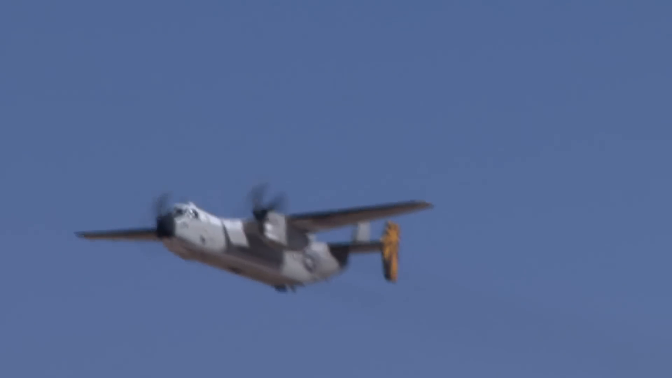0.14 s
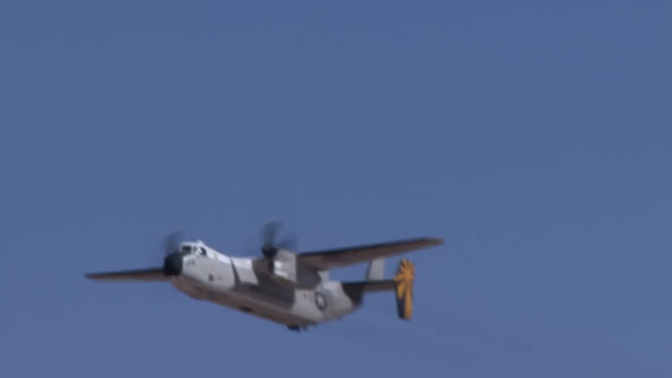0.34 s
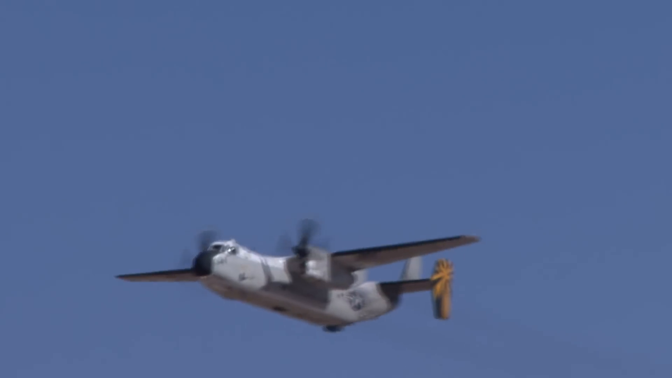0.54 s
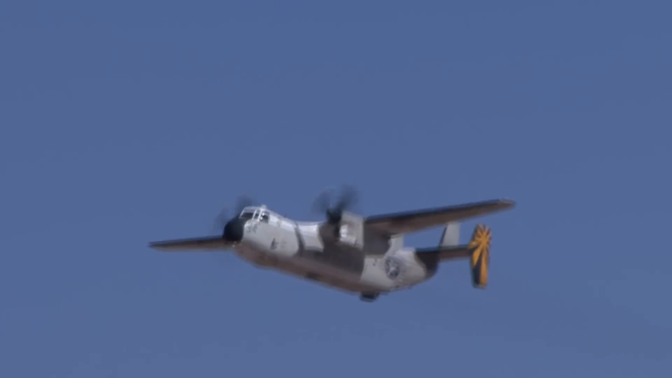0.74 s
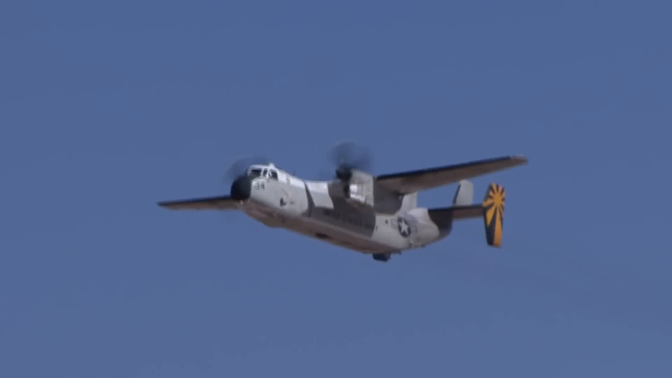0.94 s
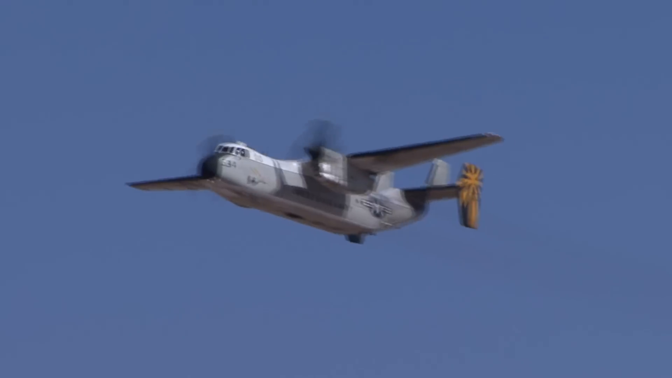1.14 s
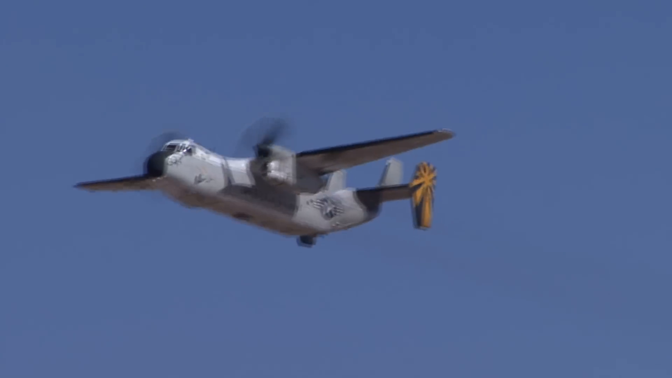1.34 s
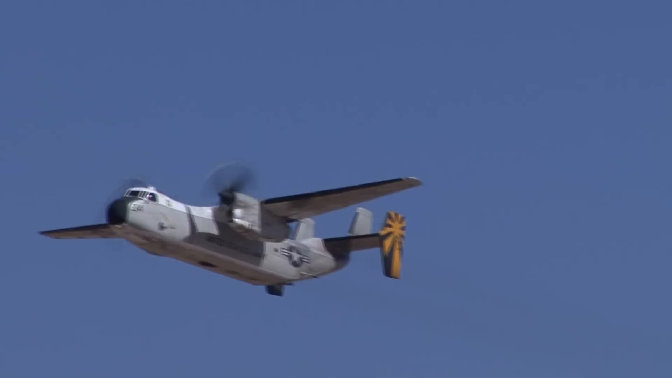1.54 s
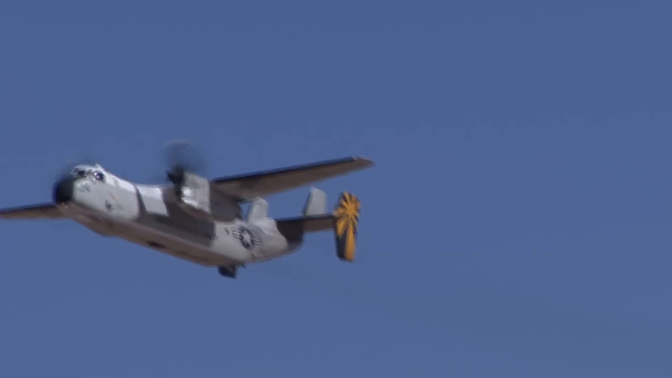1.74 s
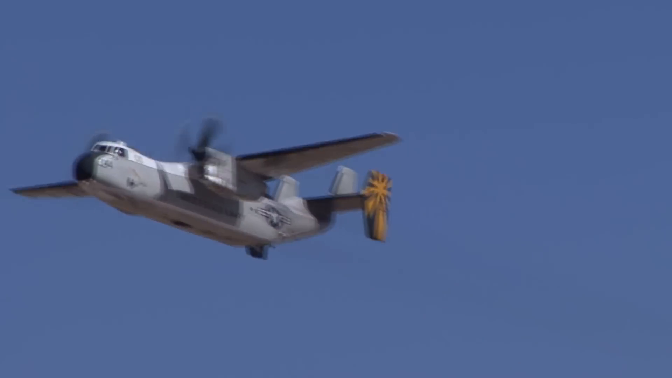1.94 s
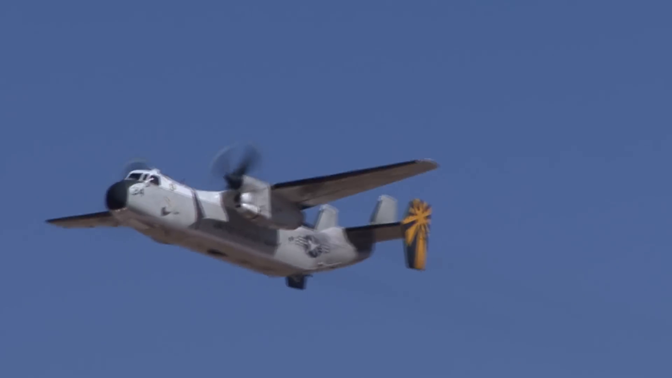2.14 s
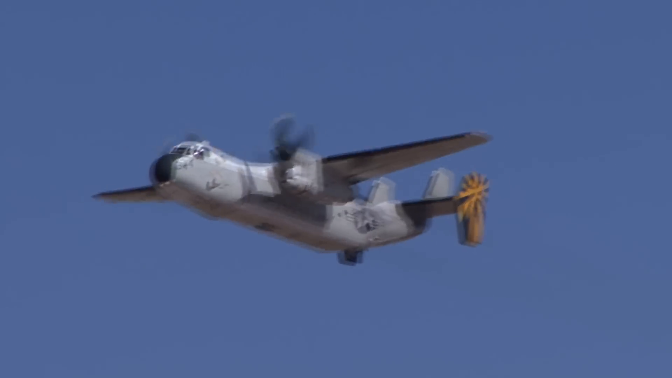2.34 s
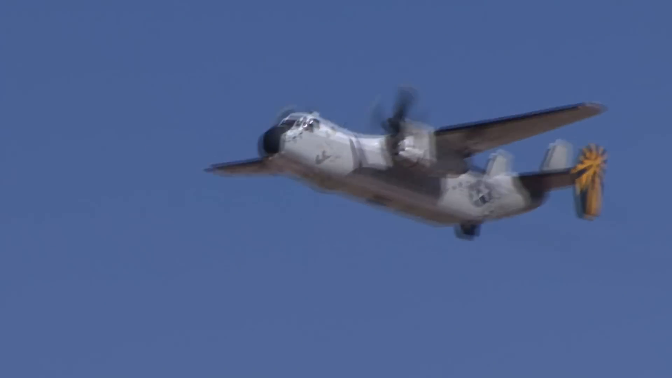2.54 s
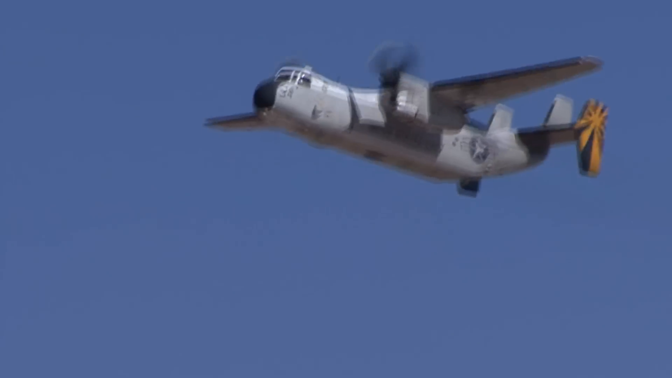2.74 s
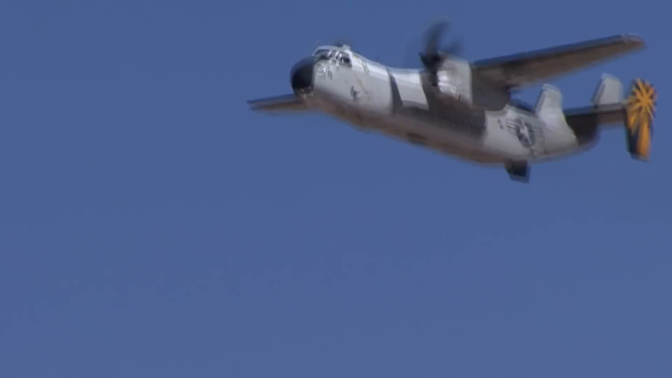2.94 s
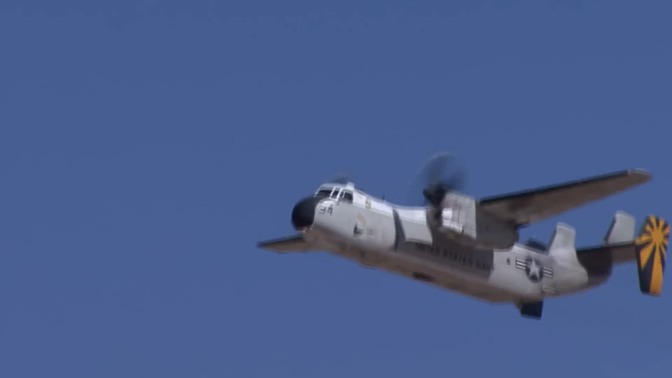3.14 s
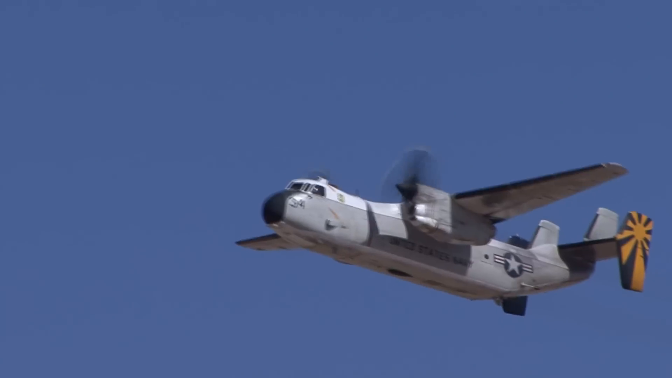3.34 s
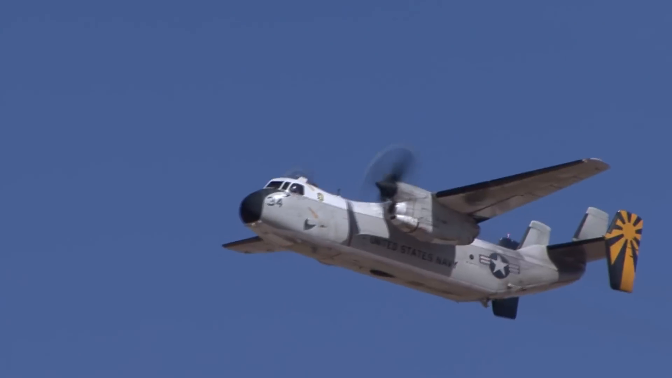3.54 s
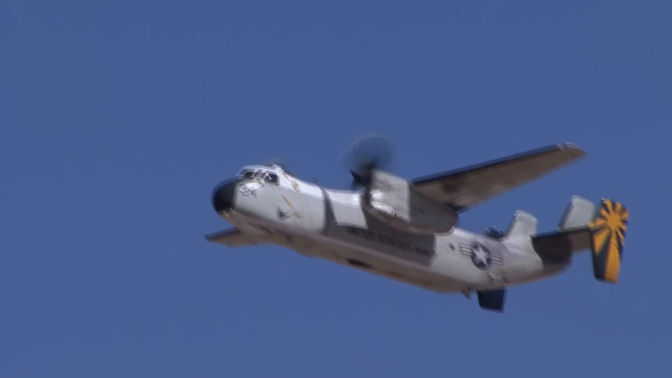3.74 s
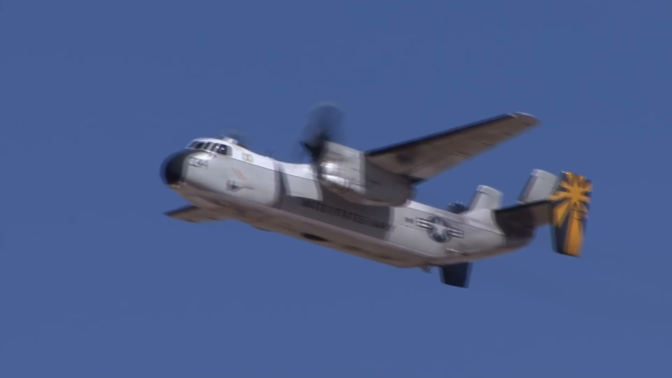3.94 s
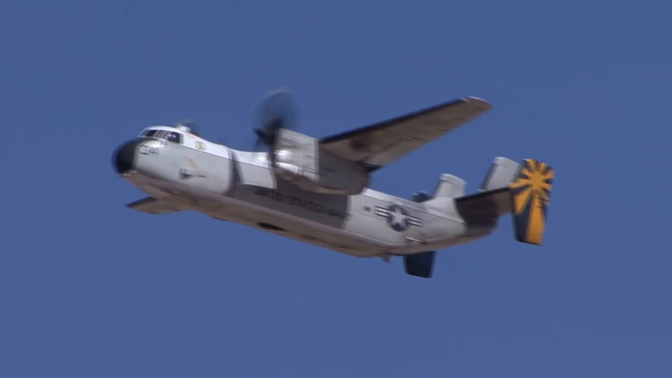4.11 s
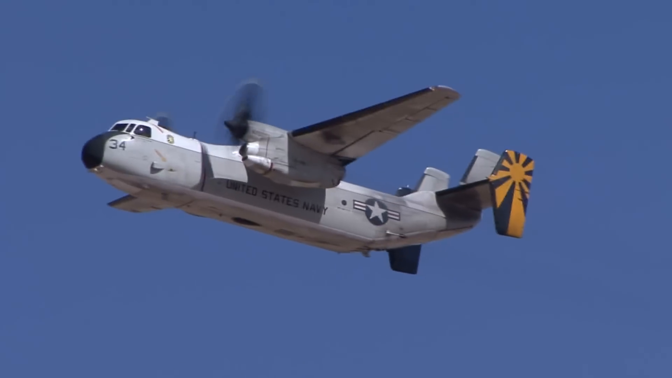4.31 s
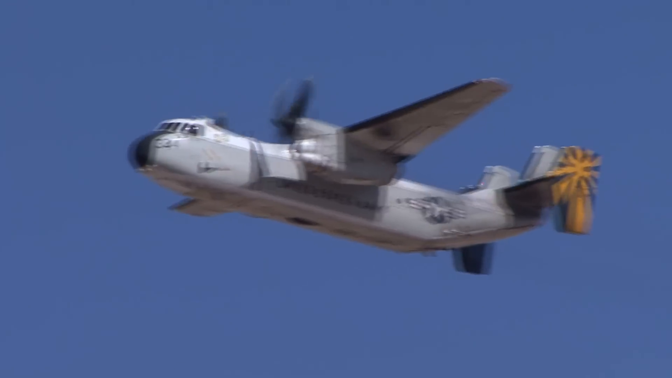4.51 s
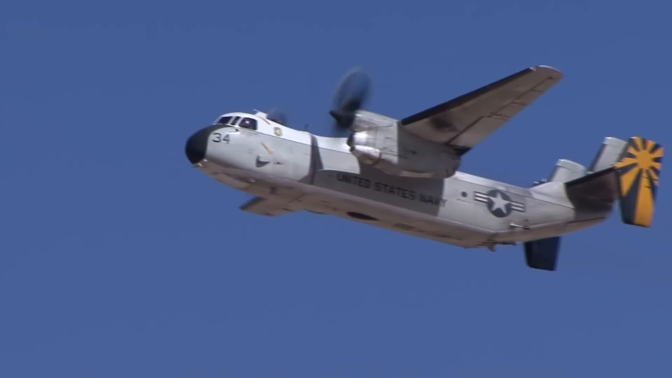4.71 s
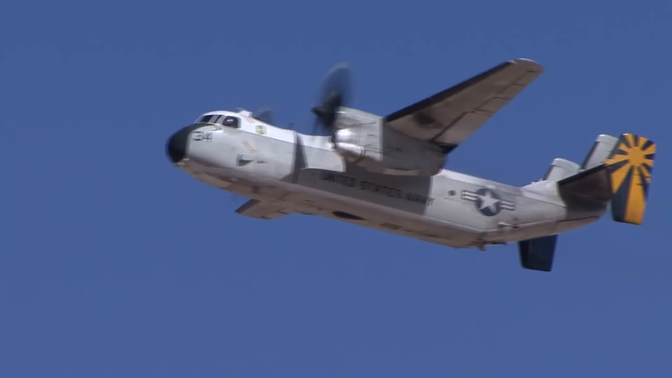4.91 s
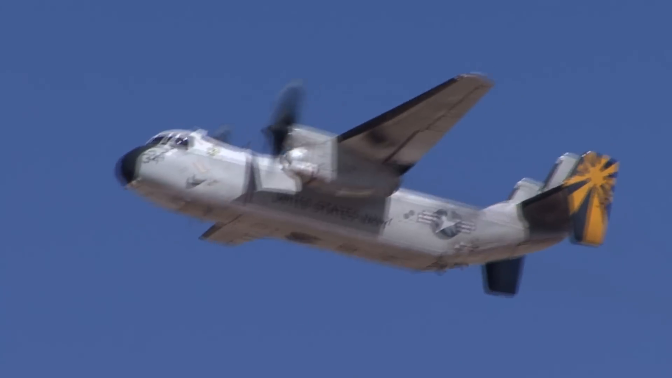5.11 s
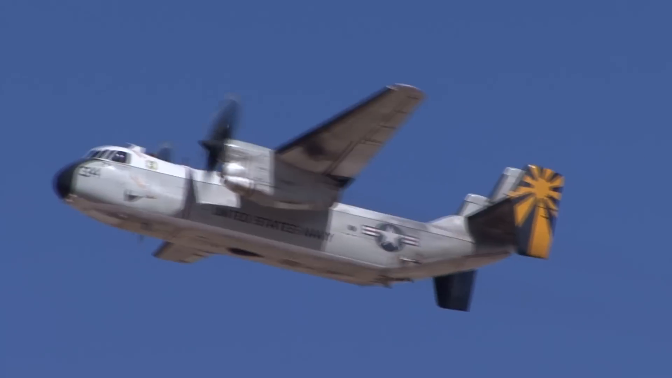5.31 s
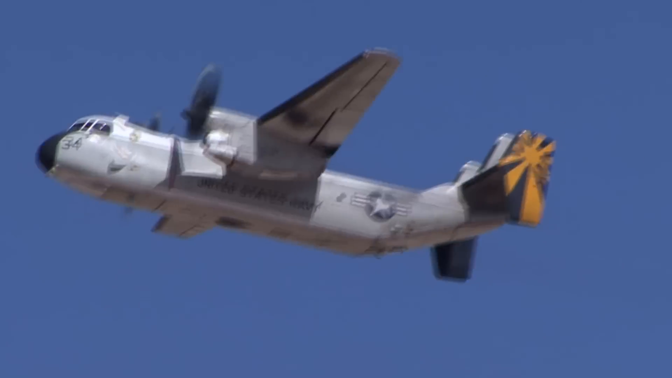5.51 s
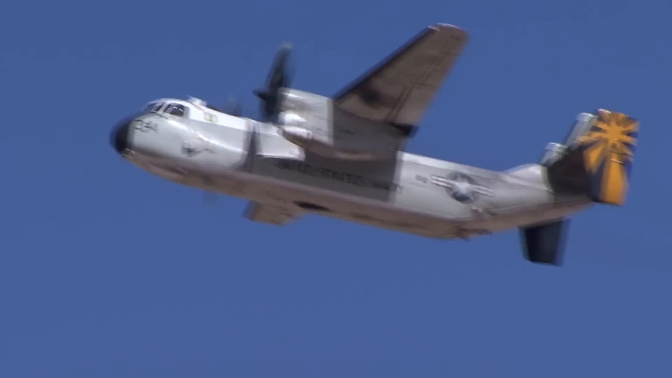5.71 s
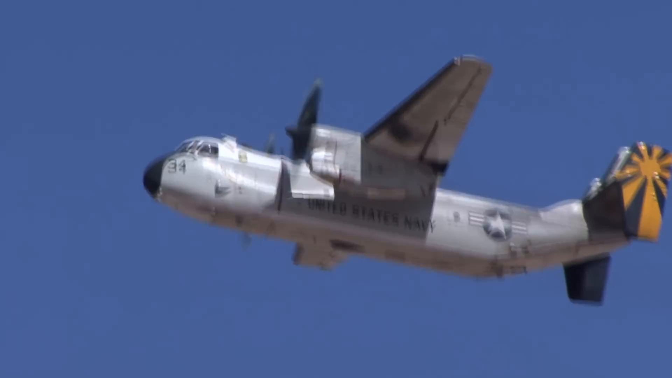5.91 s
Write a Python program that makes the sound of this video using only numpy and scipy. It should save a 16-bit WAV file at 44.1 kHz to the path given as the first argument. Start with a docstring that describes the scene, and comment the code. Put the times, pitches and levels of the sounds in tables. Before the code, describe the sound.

Outdoors, a twin-engined propeller plane approaches and flies by. A low, throbbing blade drone sits inside a broad roar that swells and fades unevenly in turbulent air. A faint thin whine rides above. The drone gets steadier and stronger as the plane nears, its pitch slipping gently down. The distant microphone picks up only a faint steady hiss besides, and the sound stops while still loud.

```python
"""Under an open sky, a twin turboprop flies low past, its pitch sinking as it draws level.
The propellers drone on harmonics of their blade rate, with a fainter buzz of upper harmonics.
Blade wakes and exhaust roar: noise in bands that swell and fade in the uneven air and phase
against their echo off the ground. Two compressor tones whine thinly on top of a faint steady hiss."""
import sys
import numpy as np
from scipy import signal
from scipy.fft import rfft, irfft
from scipy.io import wavfile

SR = 44100
rng = np.random.default_rng(int(sys.argv[2]) if len(sys.argv) > 2 else 0)


def master(y):
    """Save y as 16-bit WAV."""
    cut = np.clip(np.atleast_2d(y).T, -1, 1)
    pcm = np.round(cut * 32767)  # scale
    wavfile.write(sys.argv[1], SR, pcm.astype(np.int16))


N = 267246

# How each zone of the turbulent noise responds, from deep rumble through growl and roar to topmost hiss:
# (centre f/Hz, share of the swell, share of the rush, share of the treble, rise on approach/(dB/s))
NOISE_ZONES = [(50, 0.011, 0.043, 0.07, 0.05), (125, 0, 0, .15, 0.5), (225, 0.18, 0.085, 0.22, 1.6),
               (320, 0, 0.09, 0.68, 0), (520, 0.45, 0, 0.42, -0.25), (920, 1.16, 0, 0, 0.06),
               (1390, 0.59, 0.4, 0, -0.24), (2050, 0, 0.94, 0.16, -0.14), (3400, 0.13, 0.052, 0.87, 1.07),
               (4940, 0.087, 0, 0.6, 2.5)]


def from_db(db):
    """Decibels to gain."""
    return 10 ** (np.asarray(db) / 20)


def rms_one(x):
    """Scale to unit power."""
    return x / np.sqrt(np.mean(np.abs(x) ** 2) + 1e-20)


def in_time(rows):
    """Each column of a curve table, sample by sample."""
    times, *columns = np.transpose(rows)
    t = np.arange(N) / SR
    return [np.interp(t, times, column) for column in columns]


def about_mean(curve):
    """A level curve as dB above and below its own mean."""
    level_db, = in_time(curve)
    return level_db - np.mean(level_db)


def low_pass(x, hz, order):
    """Butterworth low-pass."""
    return signal.sosfilt(signal.butter(order, hz, fs=SR, output="sos"), x)


def coloured(spectrum):
    """Noise with the given spectrum, read on a log-frequency axis; rms 1."""
    hz = np.maximum(np.fft.rfftfreq(N, 1 / SR), 1)
    f, level_db = np.transpose(spectrum)
    gain = from_db(np.interp(np.log(hz), np.log(f), level_db))
    white = rng.standard_normal(N)
    return rms_one(irfft(rfft(white) * gain, N))


def drift(rate_hz):
    """Smooth chance of spread 1, changing about `rate_hz` times a second."""
    step = 40  # samples between slow values
    settle = 2000  # slow values dropped while the filter settles
    pole = np.exp(-2 * np.pi * rate_hz * step / SR)
    white = rng.standard_normal(N // step + 2 + settle)
    slow = signal.lfilter([1], [1, -2 * pole, pole ** 2], white)[settle:]
    return np.interp(np.arange(N) / step, np.arange(len(slow)), rms_one(slow))


def scatter(rate_hz):
    """Random amplitude and phase of a tone that has crossed turbulent air; rms 1."""
    return rms_one(drift(rate_hz) + 1j * drift(rate_hz))


def tone(phase, gain):
    """A sine of rms 1 under a complex gain."""
    return np.sqrt(2) * np.real(gain * np.exp(1j * phase))


def blade_phase():
    """Phase of the blade passing, summed from its Doppler-shifted rate."""
    # blade passing rate as heard: (t/s, f/Hz)
    blade_rate = [(0.0, 93.31), (0.4, 92.57), (1.2, 91.97), (2.0, 91.77), (2.8, 91.48), (3.1, 90.88),
                  (3.4, 89.82), (4.25, 88.83), (5.0, 86.56), (5.25, 86.21), (6.06, 83.51)]
    rate_hz, = in_time(blade_rate)
    return 2 * np.pi * np.cumsum(rate_hz) / SR


def harmonic_levels():
    """Levels of the six strong blade harmonics; the weight moves up as the aircraft draws level."""
    # one curve per harmonic, the shorter waves coming and going more: (t/s, level/dB)
    fundamental = [(0.0,-34.5),(2.42,-38),(2.66,-32),(3.05,-32.5),(3.4,-25.5),(4.08,-27),(4.66,-33),(5.2,-30),(5.6,-31),(5.85,-38),(6.06,-39)]
    second = [(0.0,-26.5),(0.55,-44),(0.95,-35),(1.1,-43),(1.4,-42),(1.55,-51),(1.65,-40.5),(1.9,-31.5),(2.5,-32.5),(2.7,-27.5),(3.55,-35),(3.65,-45.5),(3.8,-32.5),(4.1,-40.5),(4.3,-33),(4.6,-37.5),(5.25,-26),(5.7,-19),(6.06,-20)]
    third = [(0.0,-33),(0.15,-38),(0.25,-53.5),(0.9,-60),(1.15,-43.5),(1.35,-48.5),(1.8,-37),(2.0,-47),(2.15,-35),(2.4,-39.5),(2.65,-29.5),(2.9,-46),(3.08,-38.5),(3.25,-33.5),(3.4,-28),(3.5,-40.5),(3.6,-28),(3.72,-34.5),(3.92,-27),(4.03,-26.5),(4.15,-22),(4.3,-22),(4.55,-37),(4.8,-29.5),(5.15,-25.5),(5.32,-23.5),(6.06,-18)]
    fourth = [(0.0, -29.5), (0.252, -44.5), (0.3, -52), (0.45, -52), (0.55, -67), (0.6, -44.5), (0.8, -54),
              (1.05, -30.5), (1.2, -41), (1.3, -32.5), (1.6, -27.5), (1.85, -48), (1.95, -35.5), (2.0, -51),
              (2.1, -29.5), (2.45, -41.5), (2.6, -30), (2.75, -36), (2.85, -27), (3.101, -38.5),
              (3.45, -29.5), (3.55, -41.5), (3.65, -27), (3.801, -55), (3.85, -34), (4.0, -35.5),
              (4.2, -26.5), (4.35, -25.5), (4.451, -40), (4.999, -25.5), (5.15, -30), (5.33, -25),
              (5.6, -31), (5.851, -33.5), (6.06, -25)]
    fifth = [(0.0, -44.5), (0.6, -57.5), (1.1, -46), (1.6, -40.5), (1.95, -44.5), (2.45, -53.5),
             (2.65, -40), (2.8, -40.5), (2.97, -32), (3.199, -43.5), (3.7, -52.5), (4.3, -45.5), (4.6, -60),
             (4.95, -35.5), (5.15, -43), (5.35, -41.5), (5.55, -39), (5.75, -50), (5.9, -37.5), (6.06, -36)]
    sixth = [(0.0, -57.5), (0.8, -54.5), (1.1, -47), (1.55, -43.5), (1.95, -37.5), (2.3, -55), (2.7, -44.5),
             (3.1, -44.5), (4.05, -54), (4.3, -38), (4.6, -50), (4.85, -37), (5.1, -48.5), (5.35, -41),
             (5.8, -45.5), (6.06, -47.5)]
    return [in_time(curve)[0] for curve in (fundamental, second, third, fourth, fifth, sixth)]


def drone(phase, levels, approach_s, flutter_hz=11, skew_rad=.85, smear_rad=-0.5514):
    """Six harmonics make a smeared pressure pulse per blade; they flutter and slip less as the air path shortens."""
    # how deeply the air shakes each harmonic at mid-pass: (depth as a share of its level)
    shake_depths = [.075, .12, .26, .36, .5, .5]
    # how far each harmonic slips in phase at mid-pass: (spread/rad)
    wander_spreads = [.08, .3, .45, .5, .6, .5]
    steadying_db_per_s, wander_hz = 1.7, 1.3
    unrest = from_db(-steadying_db_per_s * approach_s)
    out = 0
    for k, (level_db, depth, wander) in enumerate(zip(levels, shake_depths, wander_spreads), 1):
        shake = depth * unrest
        # the divisor keeps the mean power as the shaking varies
        flutter = (1 + shake * scatter(flutter_hz)) / np.sqrt(1 + shake ** 2)
        slip = wander * unrest * drift(wander_hz)
        harmonic_phase = k * phase + skew_rad + smear_rad * k ** 2 + slip
        out = out + from_db(level_db) * tone(harmonic_phase, flutter)
    return out


def buzz(phase, buzz_db, fading_hz=4):
    """Weak upper blade harmonics, each fading in and out at random under the roar."""
    # (multiple of the blade rate, level against the buzz level/dB)
    overtones = [(7, -11), (8, -14), (10, -13), (11, -16)]
    out = 0
    for order, level_db in overtones:
        out = out + from_db(buzz_db + level_db) * tone(order * phase, scatter(fading_hz))
    return out


def flare_levels():
    """Level in dB that brief bell-shaped flares add to the topmost hiss."""
    # (centre t/s, length/s, peak level/dB)
    brief_flares = [(2.611, 0.12, 7), (3.273, 0.035, 5.5), (4.926, 0.11, 2.5), (5.166, 0.066, 5.5),
                    (5.452, 0.091, 7.5)]
    t = np.arange(N) / SR
    return sum(peak_db * np.exp(-(2 * (t - centre) / length) ** 2)
               for centre, length, peak_db in brief_flares)


def zone_levels(approach_s):
    """Rise and fall in dB of each noise zone: shares of three air-driven curves plus a steady slope."""
    # Only the movement of these curves about their mean is used: (t/s, level/dB)
    swell = [(0.0, -33.5), (0.06, -32.5), (0.2, -41), (0.38, -41), (0.58, -45.5), (0.8, -41.5),
             (0.9, -34.5), (1.08, -30.5), (1.26, -39), (1.4, -31.5), (1.55, -25), (1.75, -39.5),
             (1.98, -33.5), (2.12, -39.5), (2.28, -37), (2.46, -40), (2.55, -32.5), (2.67, -28),
             (2.77, -31.5), (2.86, -27.5), (3.0, -30), (3.1, -38), (3.22, -43.5), (3.36, -32.5),
             (3.7, -34.5), (4.02, -38.5), (4.26, -27), (4.45, -35), (4.67, -39), (4.89, -27), (5.03, -29.5),
             (5.11, -35), (5.29, -26.5), (5.39, -32), (5.74, -36), (5.9, -31), (6.06, -33.5)]  # the roar as the uneven air swells and fades it
    rush = [(0.0, -50.5), (0.22, -48), (0.56, -54.5), (0.95, -44), (1.25, -43.5), (1.39, -38), (1.5, -43),
            (1.65, -39), (1.76, -46.5), (2.2, -45), (2.5, -48), (2.62, -39.5), (2.76, -44), (2.87, -42),
            (3.0, -41), (3.11, -46.5), (3.22, -45.5), (3.32, -42), (3.55, -45), (3.8, -48), (4.28, -39.5),
            (4.6, -48), (4.76, -45.5), (4.89, -34), (5.0, -41.5), (5.14, -46), (5.26, -42), (5.52, -40.5),
            (5.72, -48.5), (5.88, -40.5), (6.06, -45.5)]  # the rush around 2 kHz, which the air fades a little differently
    treble = [(0.0,-50),(0.52,-62),(0.76,-58.5),(0.96,-55),(1.04,-49),(1.2,-55),(1.36,-46.5),(1.66,-46),(1.96,-48),(2.08,-51.5),(2.16,-47.5),(2.48,-52),(2.6,-43),(2.84,-45.5),(3.0,-45.5),(3.12,-51),(3.22,-51),(3.3,-44),(3.38,-48),(3.84,-52),(4.16,-46.5),(4.28,-43.5),(4.6,-56),(4.88,-43.5),(5.16,-51),(5.27,-41.5),(5.34,-52),(5.47,-41.5),(5.72,-53.5),(5.83,-48),(6.06,-50)]  # surges with the roar but more sharply
    swell_db, rush_db, treble_db = about_mean(swell), about_mean(rush), about_mean(treble)
    zones = []
    for _, swell_share, rush_share, treble_share, rise in NOISE_ZONES:
        air_db = swell_share * swell_db + rush_share * rush_db + treble_share * treble_db
        zones.append(air_db + rise * approach_s)
    zones[-1] = zones[-1] + flare_levels()
    return zones


def wakes(phase, zones, patchy_db=1.0, patch_hz=7, chop=0.11):
    """Turbulent noise in third octaves; each band swells with its zone and pulses as the blades pass."""
    # mean colour of the turbulence: (f/Hz, relative level per Hz/dB)
    roar_colour = [(25, -26), (60, -10.5), (120, -2), (220, -0.5), (320, 2.5), (420, -0.5), (560, -3.5),
                   (740, -4), (900, -4), (1020, -5.5), (1170, -9.5), (1470, -12), (1760, -16),
                   (2150, -16.5), (3000, -27), (4000, -36), (5000, -45)]
    log_centres = np.log([zone[0] for zone in NOISE_ZONES])
    edges = 20 * 2 ** (np.arange(27) / 3)  # Hz
    # neighbouring bands take turns between two independent noises
    noises = [coloured(roar_colour), coloured(roar_colour)]
    out = 0
    for k, (low, high) in enumerate(zip(edges, edges[1:])):
        band_filter = signal.butter(3, [low, high], "band", fs=SR, output="sos")
        band = signal.sosfilt(band_filter, noises[k % 2])
        # blend the two zones on either side of the band's centre
        log_centre = np.log(low * high) / 2
        shares = [np.interp(log_centre, log_centres, row) for row in np.eye(len(zones))]
        level_db = sum(share * zone_db for share, zone_db in zip(shares, zones))
        out = out + band * from_db(level_db + patchy_db * drift(patch_hz))
    out = out * (1 + chop * np.cos(phase))
    # little of the top survives the long way through the air
    return low_pass(out, 4980, order=16)


def over_ground(x, ground_cut_hz=1100):
    """A dull echo off the ground combs the sound; the notches sink as its lag grows."""
    # the echo lags more as the aircraft stands higher in the sky: (t/s, lag/s)
    echo_lag = [(0, .0028), (3.2, .00287), (3.5, .00315), (3.9, .0033), (4.4, .00345), (5.0, .0038),
                (5.4, .00405), (5.6, .00435), (6.06, .00465)]
    # (t/s, echo gain 0-1)
    echo_strength = [(0, 0), (2.9, .05), (3.4, .28), (4.3, .12), (5.2, .33), (6.06, .45)]
    lag_s, = in_time(echo_lag)
    strength, = in_time(echo_strength)
    now = np.arange(N)
    echo = np.interp(now - lag_s * SR, now, low_pass(x, ground_cut_hz, order=2))
    return x + strength * echo


def compressors(phase, lower_whine_db, higher_whine_db):
    """Two whines, smeared by the turbulence, that sink with the drone; the higher one needs clear air."""
    # the two tones: (multiple of the blade rate)
    whine_orders = [37.6, 55.8]
    # the lower tone is beamed ahead, the higher one abeam, each against its whine level:
    # (t/s, lower level/dB, higher level/dB)
    whine_beam = [(0, -1.5, -20), (1.8, -0.5, -26.5), (3.3, -13.5, -12), (4.3, -20.5, -12.5),
                  (6.06, -18.5, -10.5)]
    lower_beam_db, higher_beam_db = in_time(whine_beam)
    lower, higher = (tone(order * phase, scatter(110)) for order in whine_orders)
    lower = from_db(lower_whine_db + lower_beam_db) * lower
    higher = from_db(higher_whine_db + higher_beam_db) * higher
    return lower + higher


def background():
    """Faint steady hiss: noise of a fixed colour and level."""
    # (f/Hz, relative level per Hz/dB)
    hiss_colour = [(1000, -9.5), (5600, 3), (8000, 1), (11000, -3), (14500, -9)]
    return from_db(-75.5) * coloured(hiss_colour)


def scene():
    """Both propellers turn in step: one blade phase drives drone, buzz, roar and whines."""
    buzz_db, roar_db, whine_db = -37.5, -30, -65.5
    phase = blade_phase()
    approach_s = (np.arange(N) - N / 2) / SR  # seconds from the middle of the pass
    zones = zone_levels(approach_s)
    # buzz follows the growl zone, the whines the two hiss zones
    growl_db, hiss_db, top_db = zones[4], zones[8], zones[9]
    propellers = drone(phase, harmonic_levels(), approach_s) + buzz(phase, buzz_db + growl_db)
    roar = from_db(roar_db) * rms_one(over_ground(wakes(phase, zones)))
    whines = compressors(phase, whine_db + hiss_db, whine_db + top_db)
    return (propellers + roar + whines + background())[None]


def record(dry):
    """The sound eases in and out over 3 ms; the top is cut steeply at 15 kHz."""
    from_start = np.arange(N)
    to_nearest_end = np.minimum(from_start, from_start[::-1])
    ease = np.sin(np.pi / 2 * np.minimum(1, to_nearest_end / (.003 * SR))) ** 2
    # 0.1 dB ripple below the cut, 80 dB down above it
    steep_cut = signal.ellip(10, .1, 80, 15000, fs=SR, output="sos")
    return signal.sosfilt(steep_cut, dry * ease)


dry = scene()
out = record(dry)
master(out)
```